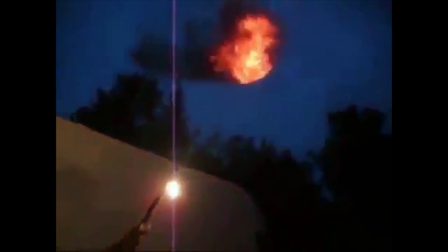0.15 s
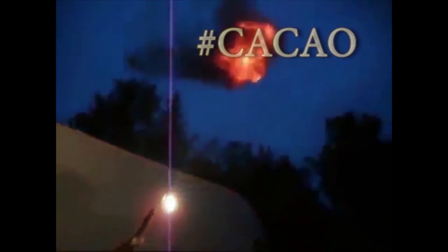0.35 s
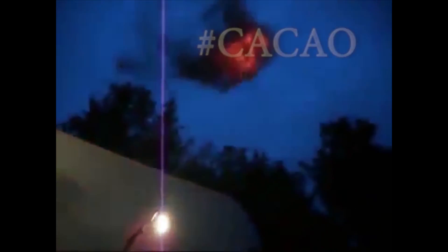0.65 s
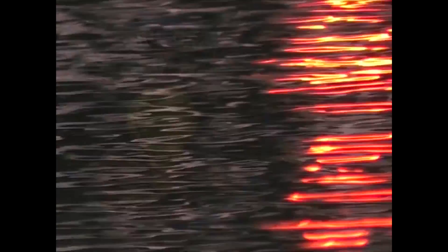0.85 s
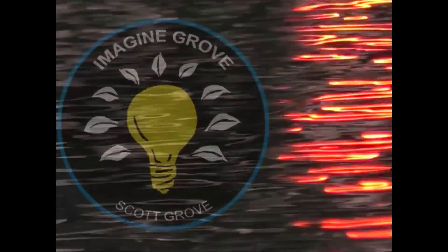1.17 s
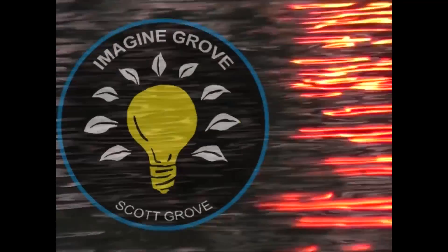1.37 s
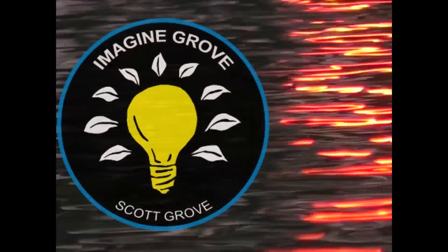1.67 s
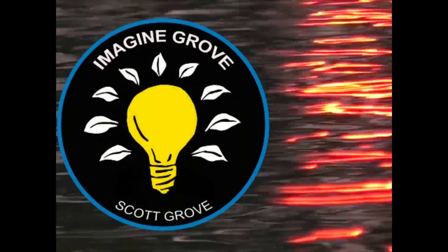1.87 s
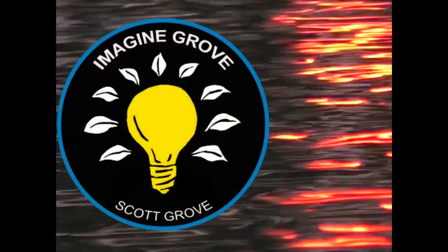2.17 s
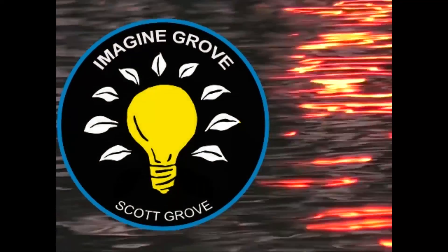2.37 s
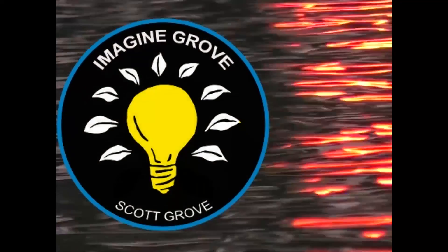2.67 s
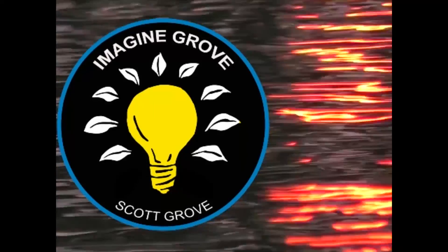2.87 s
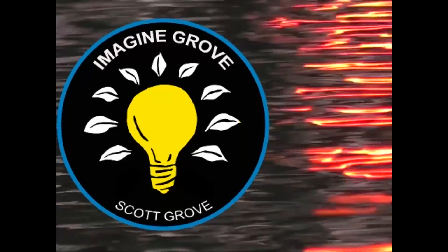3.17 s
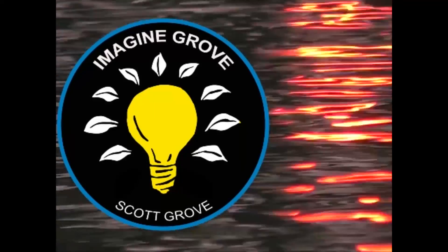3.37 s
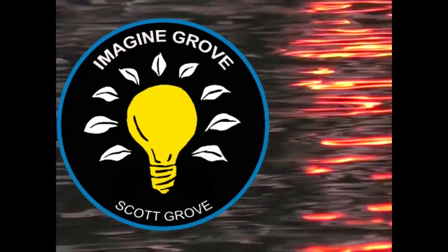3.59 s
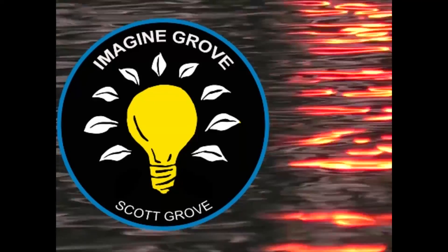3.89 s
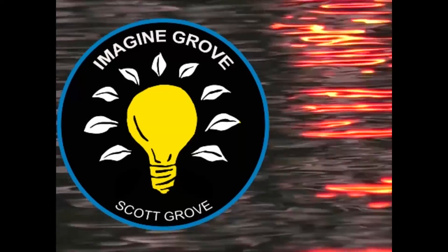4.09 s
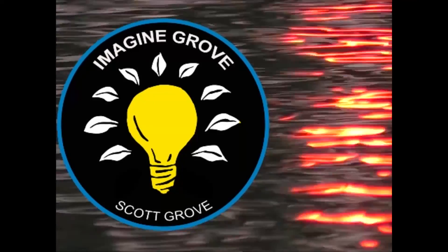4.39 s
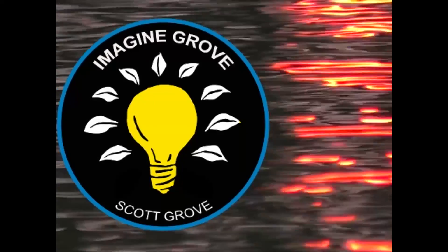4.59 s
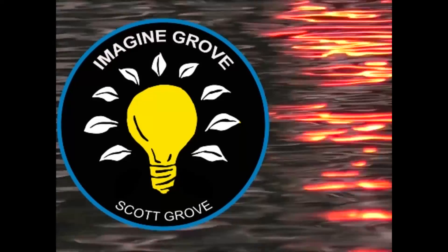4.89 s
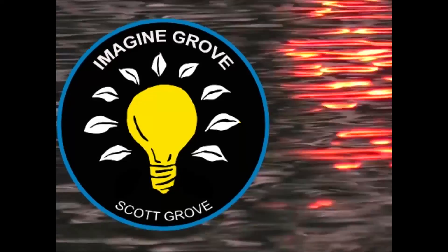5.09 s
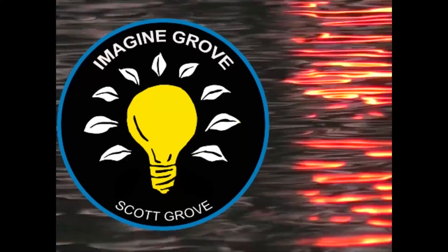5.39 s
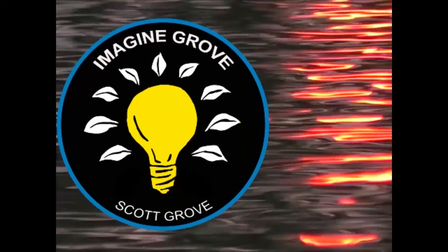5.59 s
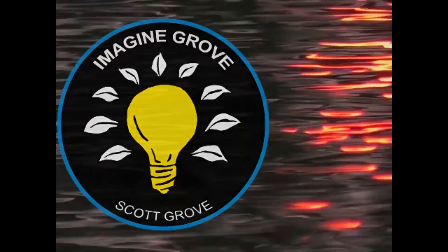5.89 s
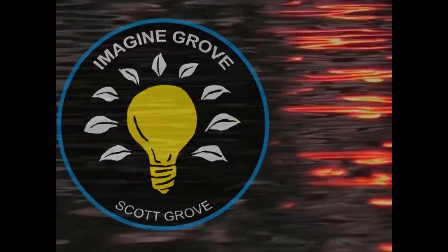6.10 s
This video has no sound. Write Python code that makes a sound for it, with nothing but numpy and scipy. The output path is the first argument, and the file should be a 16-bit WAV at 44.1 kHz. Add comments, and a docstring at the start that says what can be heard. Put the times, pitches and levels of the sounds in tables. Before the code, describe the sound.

Outdoors, a fireball roars loudly through a small, dull, slightly overloaded microphone, fluttering and crackling with sharp bursts. It chokes briefly, catches again with a low thump and a raspier edge, then stops dead before one second. A far quieter bed of faint hiss and low rumble follows, swelling slowly; after four seconds a soft gust buffets with a few low thuds, then passes.

```python
"""A fireball roars and crackles outdoors: fluttering noise and dense random impulses, coloured as flame,
with a rasp near 2 kHz and sharp bursts; near surfaces reflect it and a small, dull microphone limits it.
The roar stops dead just before one second, leaving a bed of faint filtered-noise hiss and low rumble.
The bed swells once, slowly; a little after four seconds a soft gust of buffeting and low thuds passes."""
import sys
import numpy as np
from scipy import signal
from scipy.fft import rfft, irfft
from scipy.io import wavfile
from scipy.ndimage import uniform_filter1d

SR = 44100
rng = np.random.default_rng(int(sys.argv[2]) if len(sys.argv) > 2 else 0)


def wav_out(sig):
    """Save sig, one row per channel (or a flat mono array), as 16-bit PCM at SR to the path in sys.argv[1]."""
    wavfile.write(sys.argv[1], SR, np.round(np.clip(np.atleast_2d(sig).T, -1, 1) * 32767).astype(np.int16))


N = 275580
TIME, HZ = np.arange(N) / SR, np.fft.rfftfreq(N, 1 / SR)

ROAR_ENDS_S, ROAR_TOP_HZ = .897, 5340
# the flame chokes once, holds and catches again
CHOKE_AT_S, CHOKE_FALL_S, CHOKE_HOLD_S, CHOKE_RECOVER_S = .255, .012, 0.0321, 0.025


def gain_of(db):
    """Decibels to amplitude."""
    return 10 ** (np.asarray(db) / 20)


def evened(x):
    """Scales to rms 1."""
    return x / np.sqrt(np.mean(x ** 2) + 1e-20)


def colour(points, hz):
    """Spectral gain, interpolated in dB over log frequency."""
    point_hz, point_db = np.transpose(points)
    return gain_of(np.interp(np.log(hz + 1), np.log(point_hz + 1), point_db))


def below(hz, edge_hz, order):
    """Gain of a low-pass."""
    return 1 / np.sqrt(1 + (hz / edge_hz) ** (2 * order))


def above(hz, edge_hz, order):
    """Gain of a high-pass."""
    return np.sqrt(1 - below(hz, edge_hz, order) ** 2)


def shaped(x, gain):
    """Filters x by a gain for every frequency."""
    return irfft(rfft(x) * gain, N)


def noise(gain):
    """Coloured noise of rms 1."""
    return evened(shaped(rng.standard_normal(N), gain))


def wander(edge_hz):
    """Smooth random fluctuation of rms 1: low-passed noise."""
    return noise(below(HZ, edge_hz, order=3))


def patchy_noise(gain_at, patchy_db, patch_s, patch_hz):
    """Noise of rms 1 whose level drifts in small patches of time and frequency."""
    frame, hop = 1024, 256
    hz = np.fft.rfftfreq(frame, 1 / SR)
    real, imag, patches = rng.standard_normal((3, N // hop + 5, len(hz)))
    for axis, size in enumerate([patch_s * SR / hop, patch_hz / hz[1]]):
        patches = uniform_filter1d(patches, max(1, round(size)), axis=axis)
    spectra = (real + 1j * imag) * gain_at(hz) * gain_of(patchy_db * evened(patches))
    _, x = signal.istft(spectra.T, nperseg=frame, noverlap=frame - hop)
    return evened(x[:N])


def plateau(start_s, rise_s, hold_s, fall_s):
    """An envelope from 0 to 1: attack, hold, release."""
    return np.interp(TIME, np.cumsum([start_s, rise_s, hold_s, fall_s]), [0, 1, 1, 0])


def bump(centre_s, half_s):
    """Gaussian pulse of height 1."""
    return np.exp(-((TIME - centre_s) / half_s) ** 2)


def thud(centre_s, peak_db, pitch_hz, half_s):
    """A rounded push of air: a short low cosine in a Gaussian envelope."""
    return gain_of(peak_db) * bump(centre_s, half_s) * np.cos(2 * np.pi * pitch_hz * (TIME - centre_s))


def hiss(swell):
    """A shimmering hiss of patchy noise, a smooth high fizz, and a thin wavering whine of narrow noise."""
    # hiss colour: freq_hz, density_db (per Hz)
    hiss_colour = [(500, -8.5), (660, -1.5), (840, -10), (1020, 1.5), (1200, -2.5), (1400, 0), (1950, -2.5),
                   (2200, -1), (2600, -1), (3100, -4.5), (4000, -5.5), (5200, -3), (5800, -7),
                   (7000, -10.5)]
    # fizz colour: freq_hz, density_db (per Hz)
    fizz_colour = [(6800, -5), (8000, -2.5), (10000, 0.5), (11500, -3), (13000, -6), (15500, -9)]
    hiss_db, hiss_swell_db = -52.5, 1.32
    fizz_db, fizz_swell_db = -54.5, 3.5
    whine_hz, whine_half_width_hz, whine_re_hiss_db = 3552, 40, -17
    whine_waver_db, whine_waver_hz = 3.5, 3.7

    def hiss_gain(hz):
        """Band limits around the hiss colour."""
        return colour(hiss_colour, hz) * above(hz, 420, order=6) * below(hz, 6200, order=8)

    body = patchy_noise(hiss_gain, patchy_db=2.5, patch_s=.09, patch_hz=260)
    fizz = noise(colour(fizz_colour, HZ) * above(HZ, 6140, order=8))
    whine = noise(below(abs(HZ - whine_hz), whine_half_width_hz, order=2))
    whine *= gain_of(whine_re_hiss_db + whine_waver_db * wander(whine_waver_hz))
    hiss_level = gain_of(hiss_db + hiss_swell_db * swell)
    fizz_level = gain_of(fizz_db + fizz_swell_db * swell)
    return hiss_level * (body + whine) + fizz_level * fizz


def rumble(swell, blow):
    """A hollow low noise that wavers, swells a little and rises with the gust."""
    # rumble colour: freq_hz, density_db (per Hz)
    rumble_colour = [(15, -31), (40, -22.5), (80, -12), (110, -6.5), (150, -1.5), (200, 1.5), (260, -2.5),
                     (320, -8), (400, -21.5), (480, -24.5)]
    rumble_db, swell_db, blow_db = -45.5, 0.7, 1.5
    waver_db, waver_hz = 1.14, 5
    level_db = rumble_db + swell_db * swell + blow_db * blow + waver_db * wander(waver_hz)
    return gain_of(level_db) * noise(colour(rumble_colour, HZ) * below(HZ, 428, order=10))


def gust(swell, blow):
    """Low buffeting noise stirs faintly with the swell and blows up once, with a few rounded thuds."""
    # thuds within the gust: centre_s, relative_peak_db, pitch_hz, half_s
    thud_rows = [(4.268, -28.5, 84, 0.022), (4.318, -35, 136, 0.019), (4.364, -28.5, 180, 0.0071),
                 (4.587, -39, 65, 0.011)]
    gust_db, stir_db, thuds_trim_db = -45, -61, -1
    level = gain_of(stir_db) * swell + gain_of(gust_db) * blow
    buffet = level * noise(below(HZ, 120, order=3) * above(HZ, 44, order=2))
    thuds = sum(thud(centre_s, peak_db + thuds_trim_db, pitch_hz, half_s)
                for centre_s, peak_db, pitch_hz, half_s in thud_rows)
    return buffet + thuds


def tick():
    """One faint bright tick as the roar dips: a brief pulse of high noise."""
    tick_at_s, tick_db, half_s = .2622, -44, 0.0011
    return gain_of(tick_db) * bump(tick_at_s, half_s) * noise(above(HZ, 5000, order=4) * below(HZ, 7000, order=1))


def crackle(per_s, spread_db):
    """Countless tiny pockets of fuel ignite: random impulses of rms 1, most weak and a few strong."""
    size_db = spread_db * np.minimum(rng.exponential(1, N), 2.4)
    sizes = gain_of(size_db) * rng.choice([-1, 1], N)
    return evened(sizes * (rng.random(N) < per_s / SR))


def bursts(flame):
    """Pockets of fuel burst: returns flame-coloured pressure spikes and the roar's lift around them in dB."""
    # bursts: centre_s, relative_peak_db, surge_db
    pop_rows = [(.014, -13, 6.5), (.0739, -8, 9), (0.09, -10.5, 3), (.1305, 2, -7), (0.1432, -9, 1.5),
                (.2206, -10.5, 8), (.2354, -14, 5), (0.2437, -14.5, 7.5), (0.386, -19.5, 3.5),
                (0.419, -10.5, -5), (0.756, -8, 3.5), (.7687, -11, 4), (0.7753, -9, 4.5), (.861, -5, 7),
                (0.8785, -10, 2.5), (0.8826, -5.5, 3)]
    pops_trim_db, surge_half_s = -1, 0.0021
    flare_db, flare_half_s = 0.75, .011
    spikes, lift_db = np.zeros(N), np.zeros(N)
    for centre_s, peak_db, surge_db in pop_rows:
        spikes[round(centre_s * SR)] = gain_of(peak_db + pops_trim_db)
        lift_db += surge_db * bump(centre_s, surge_half_s) + flare_db * bump(centre_s, flare_half_s)
    unit_peak = irfft(flame, N)[0]
    return shaped(spikes, flame) / unit_peak, lift_db


def blaze(flame, lift_db, choke):
    """Turbulence and dense crackle under fast flutter; the sizzle on top swings less than the body."""
    roar_db, crackle_db, choke_db = -17.5, -3, -6.5
    flutter_db, flutter_hz = 1.2, 130
    waver_db, waver_hz = 0.58, 14
    sizzle_db, sizzle_follows = -0.4, 0.49
    swing_db = choke_db * choke + waver_db * wander(waver_hz)
    grains = gain_of(crackle_db) * crackle(per_s=900, spread_db=4.5)
    turbulence = (rng.standard_normal(N) + grains) * gain_of(flutter_db * wander(flutter_hz))
    whole = evened(shaped(turbulence, flame * above(HZ, 284, order=3)))
    sizzle = shaped(whole, above(HZ, 3300, order=10))
    body = whole - sizzle
    swung = gain_of(swing_db) * body + gain_of(sizzle_db + sizzle_follows * swing_db) * sizzle
    return gain_of(roar_db + lift_db) * swung


def billow(flame, choke):
    """Low flame noise that heaves up during the choke."""
    billow_db, heave_db = -28, 6.5
    level = gain_of(billow_db + heave_db * choke)
    return level * noise(flame * below(HZ, 430, order=3) * above(HZ, 16, order=2))


def rasp(flame):
    """Sparser crackle rings a resonance near 2 kHz, a few milliseconds each time."""
    # rasp level: time_s, relative_level_db
    rasp_points = [(0.0, -36), (0.196, -25), (0.29, -31), (0.32, -16.5), (0.362, -22.5), (0.386, -14.5),
                   (0.42, -21), (0.588, -22.5), (0.88, -22.5)]
    rasp_trim_db, ring_hz, ring_decay_s = -1.5, 1990, 0.0012
    level_db = np.interp(TIME, *np.transpose(rasp_points)) + rasp_trim_db
    ring = np.cos(2 * np.pi * ring_hz * TIME) * np.exp(-TIME / ring_decay_s)
    return gain_of(level_db) * evened(shaped(crackle(per_s=350, spread_db=5.5), rfft(ring) * flame))


def reflected(x):
    """Adds delayed copies from near surfaces, scaled for the same nominal total power."""
    # reflections: delay_s, level_db
    echo_rows = [(.00458, -20), (.00914, -19), (.01397, -10)]
    echoes = sum(gain_of(level_db) * np.pad(x, (round(delay_s * SR), 0))[:N] for delay_s, level_db in echo_rows)
    power = 1 + sum(gain_of(level_db) ** 2 for _, level_db in echo_rows)
    return (x + echoes) / np.sqrt(power)


def microphone(x):
    """A small microphone rounds off the highest peaks, has a notch near 4 kHz and passes no high treble."""
    ceiling, notch_hz, notch_half_width_hz = .85, 3930, 130
    rounded = x / (1 + (abs(x) / ceiling) ** 8) ** (1 / 8)
    notch = above(abs(HZ - notch_hz), notch_half_width_hz, order=4)
    return shaped(rounded, notch * below(HZ, ROAR_TOP_HZ, order=160))


def roar():
    """Blaze, billow, rasp and sharp bursts of the fireball, with reflections."""
    # roar colour: freq_hz, density_db (per Hz)
    flame_colour = [(30, -2.5), (130, -0.5), (330, -5), (650, -3), (1080, -0.5), (1550, -1.5), (2100, -3.5),
                    (2500, -6), (2950, -9.5), (3650, -23.5), (3950, -54), (4150, -26), (4750, -16),
                    (5250, -10)]
    flame = colour(flame_colour, HZ) * below(HZ, ROAR_TOP_HZ, order=160)
    choke = plateau(CHOKE_AT_S, CHOKE_FALL_S, CHOKE_HOLD_S, CHOKE_RECOVER_S)
    pops, lift_db = bursts(flame)
    # the flame catches again with a low thump
    catch_s = CHOKE_AT_S + CHOKE_FALL_S + CHOKE_HOLD_S
    thump = thud(catch_s, peak_db=-20.5, pitch_hz=118, half_s=.014)
    return reflected(blaze(flame, lift_db, choke) + billow(flame, choke) + rasp(flame) + thump - pops)


def scene():
    """The roar gives way abruptly to the quiet bed."""
    fade_s = .002
    burning = np.clip(np.minimum(TIME, ROAR_ENDS_S - TIME) / fade_s, 0, 1)
    bed_on = np.clip((TIME - ROAR_ENDS_S) / fade_s + 1, 0, 1)
    swell = plateau(start_s=2.11, rise_s=1.0, hold_s=1.45, fall_s=1.86)
    blow = plateau(start_s=4.1, rise_s=0.077, hold_s=0.11, fall_s=.22)
    bed = hiss(swell) + rumble(swell, blow) + gust(swell, blow)
    mono = burning * microphone(roar()) + tick() + bed_on * bed
    return mono[None]


def record(dry):
    """A steep low-pass band limit."""
    edge_hz = 15700
    taps = signal.firwin(511, edge_hz, window=("kaiser", 9), fs=SR)
    return signal.oaconvolve(dry, taps[None], "same")


dry = scene()
out = record(dry)
wav_out(out)
```